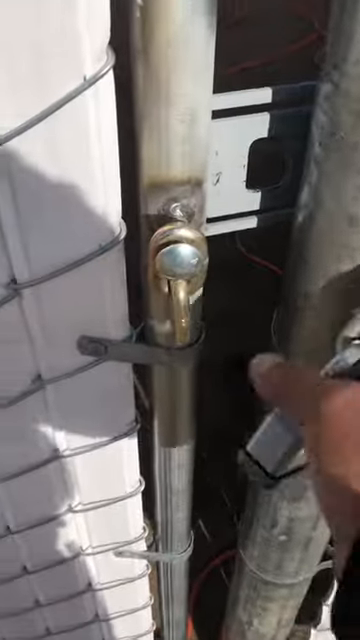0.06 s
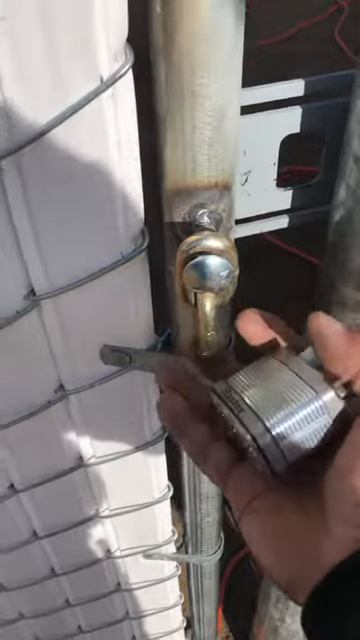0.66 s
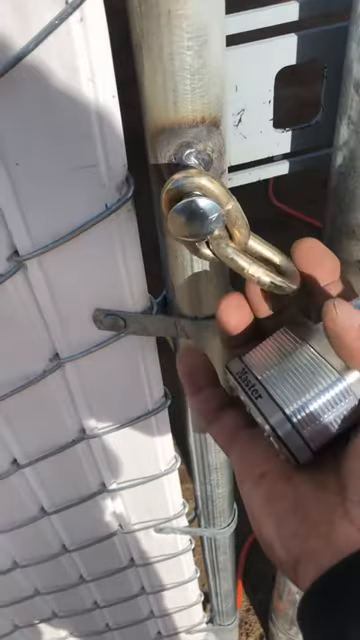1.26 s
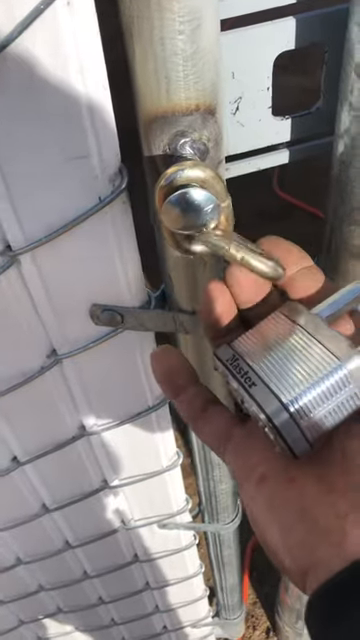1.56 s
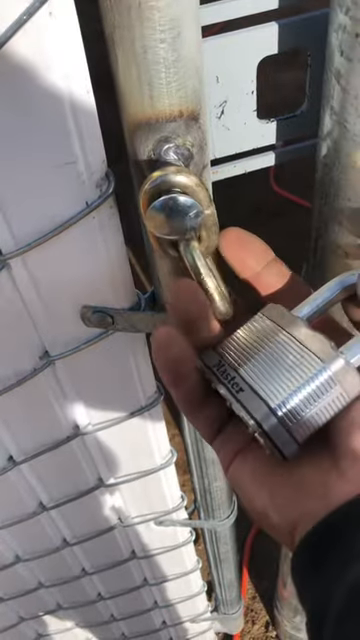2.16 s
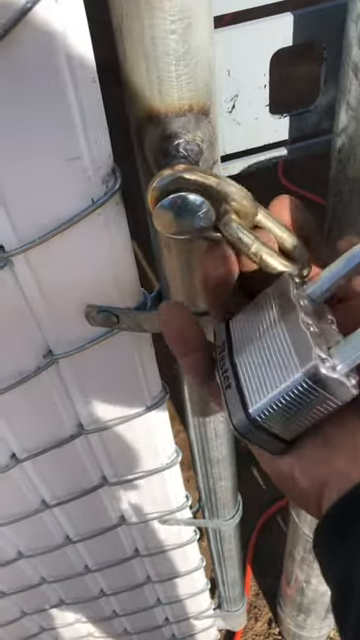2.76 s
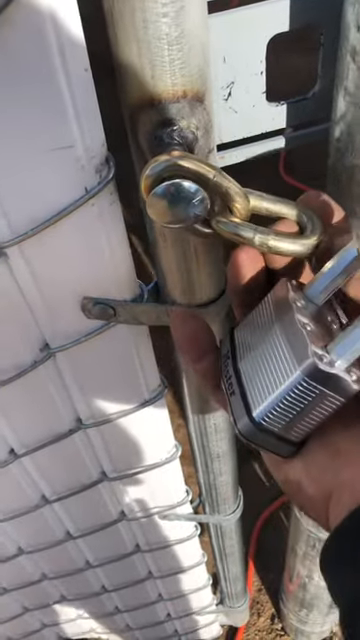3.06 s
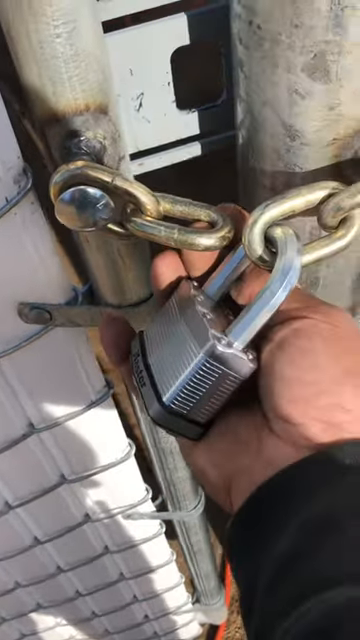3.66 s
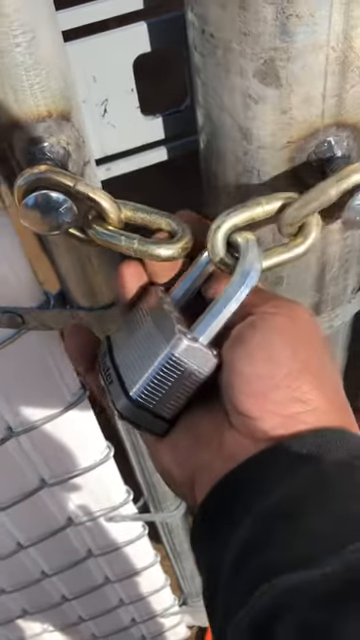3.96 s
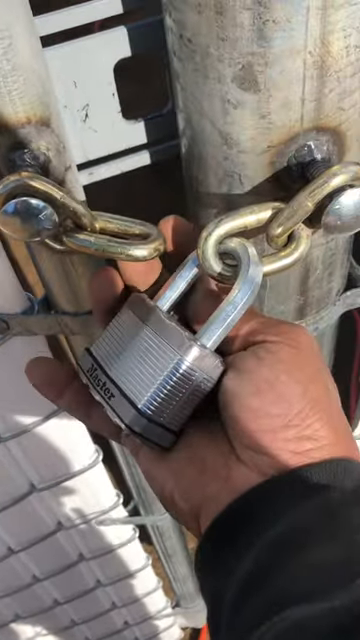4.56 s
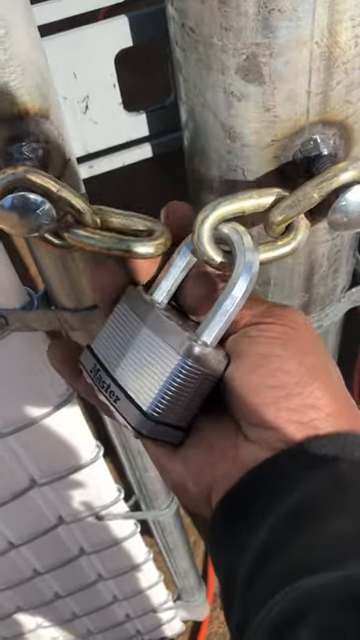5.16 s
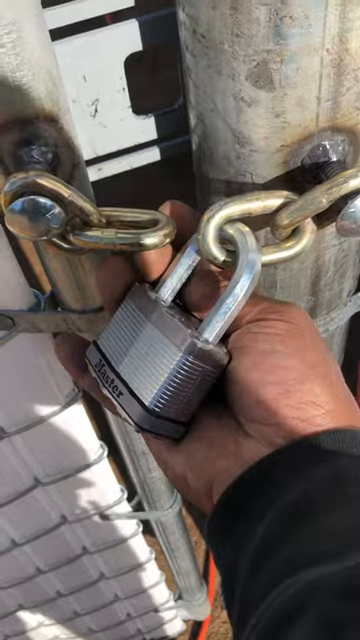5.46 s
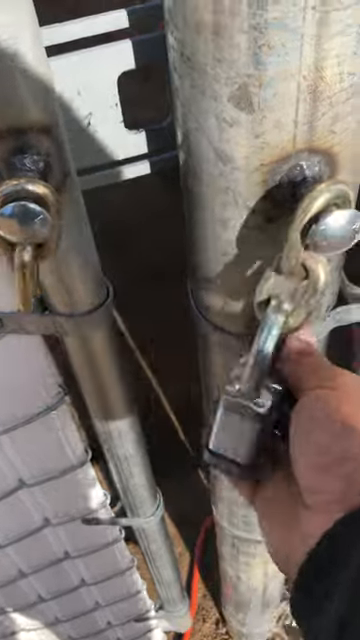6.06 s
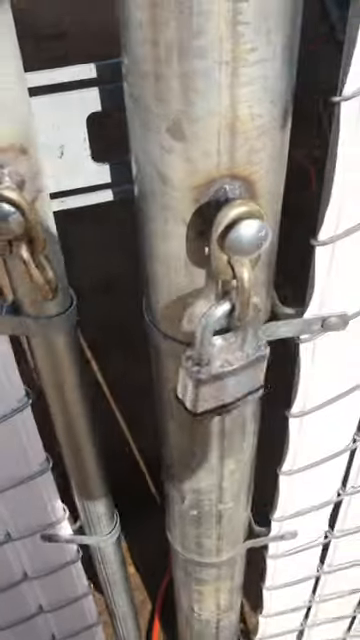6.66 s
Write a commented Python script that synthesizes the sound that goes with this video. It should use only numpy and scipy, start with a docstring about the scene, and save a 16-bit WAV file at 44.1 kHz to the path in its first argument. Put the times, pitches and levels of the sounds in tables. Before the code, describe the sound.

Close to the microphone outdoors, a hand rubs over a padlock while chain links knock against a steel gate, making it clatter and giving very high pings. The lock clicks sharply, then the chain shifts with lighter taps. Near the end the knocks pick up again and the lock swings into a hollow post with a thud and ringing clanks. Distant traffic, a low motor hum and a small bird stay faint behind.

```python
"""A padlock is hooked into a chain on a steel gate, close by and outdoors.
Links knock on the gate and ping very high; the lock clicks and swings against the hollow post.
Each hard blow is a crack, the ringing of the struck steel and a clatter from the loose gate.
Hand and sleeve rub with a grainy hiss, and there are a few thin squeaks.
Far off, traffic rumbles, a motor hums, a vehicle gathers speed and a small bird chirps."""
import sys
import numpy as np
from scipy import signal
from scipy.fft import rfft, irfft, next_fast_len
from scipy.io import wavfile
from scipy.ndimage import uniform_filter1d, map_coordinates

SR = 44100
rng = np.random.default_rng(int(sys.argv[2]) if len(sys.argv) > 2 else 0)


def materialize(psi):
    """Save the field psi as 16-bit PCM at rate SR to the path in sys.argv[1].

    A 1-D psi becomes a single channel; in a 2-D psi each row is a channel.
    """
    bounded = np.clip(np.atleast_2d(psi).T, -1, 1)
    quanta = np.round(bounded * 32767).astype(np.int16)
    wavfile.write(sys.argv[1], SR, quanta)


N = 304455
TOP_HZ = 15900  # upper edge of the treble

# The tone colour of a soft, low rush. Each row: frequency in Hz, level in dB.
RUSH_COLOUR = [(200, -22.5), (300, -1), (470, -10), (950, -8), (1500, -15.5), (2600, -23), (4000, -28),
               (7000, -34), (12500, -37.5), (16000, -38)]
# The tone colour of the gate's clatter. Each row: frequency in Hz, level in dB.
GATE_COLOUR = [(150, -9), (330, -1), (560, 2), (720, 12), (860, -5.5), (1150, 0), (1450, -9.5), (1700, -4),
               (2500, -2.5), (4100, -5), (5400, -12.5), (7000, -1.5), (9000, -18), (16000, -8.5)]
# The lock's modes (the tones it rings with). Each row: pitch in Hz, level in dB, ring time in seconds.
LOCK_TONES = [(985, -2.5, 0.17), (972, 19, 0.011), (1905, -6, 0.038), (2625, -19.5, 0.12),
              (4030, -10.5, 0.031), (4700, 4.5, 0.026), (5270, -16, 0.17), (6120, 3, 0.015),
              (6820, -1.5, 0.048), (8260, -3, .03), (9010, -10.5, 0.12), (9100, -14.5, 0.014),
              (10500, -17, 0.026), (15200, -21, .03)]
# The three high tones of a link in Hz, lowest first.
LINK_TONES_HZ = [13390, 13915, 14816]
# Spells when links slide on each other. Each row: start in seconds, length in seconds, strength in dB.
LINK_SLIDES = [(0.85, 0.28, -67.5), (1.4, 0.18, -68.5), (1.92, .25, -70.5), (2.3, .3, -62),
               (2.66, .26, -69.5), (3.86, 0.27, -69.5), (4.5, 0.76, -73.5), (5.75, 0.57, -64)]


def amp(db):
    """Turn decibels into a gain."""
    return 10 ** (np.asarray(db) / 20)


def unit(x):
    """Scale a sound to an average (rms) level of 1."""
    return x / np.sqrt(np.mean(x ** 2) + 1e-20)


def seconds(length):
    """The time of each sample, in seconds."""
    return np.arange(int(length * SR)) / SR


def wobble(rate, size=N):
    """A smooth curve through `rate` random points a second."""
    points = rng.standard_normal(int(size * rate / SR) + 4)
    return map_coordinates(points, [np.arange(size) * rate / SR])


def noise(colour, size=N):
    """Noise shaped by rows of frequency in Hz and level in dB."""
    hz, db = np.transpose(colour)
    padded = next_fast_len(size)
    gain = amp(np.interp(np.log(np.fft.rfftfreq(padded, 1 / SR) + 1), np.log(hz), db))
    return unit(irfft(rfft(rng.standard_normal(padded)) * gain, padded)[:size])


def fade(t, t60):
    """Die away by 60 dB in t60 seconds, the ring time."""
    return np.exp(-np.log(1000) * t / t60)


def add(track, start, sound):
    """Mix a sound into the track at `start` seconds."""
    part = track[max(round(start * SR), 0):][:len(sound)]
    part += sound[:len(part)]


def ring(modes, t, scatter_db=3.0, shift=0):
    """Fading tones, a little different at every blow; `shift` lets the grip nudge their pitch."""
    draws = rng.standard_normal((len(modes), 3))
    out = np.zeros(len(t))
    for (hz, db, t60), (size, grip, phase) in zip(modes, draws):
        tone = np.sin(2 * np.pi * (hz * (1 + shift * grip) * t + phase))
        out += amp(db + scatter_db * size) * fade(t, t60) * tone
    return out


def grit(rate, spread_db):
    """Tiny random slips, about `rate` a second, some larger than the rest."""
    slips = rng.random(N) < rate / SR
    sizes = amp(spread_db * np.minimum(rng.exponential(size=N), 3))
    return slips * sizes * rng.choice([-1, 1], size=N)


def movements(rows, attack_s=0.014, release_s=0.087):
    """A loudness curve in which each movement swells, holds and dies away."""
    t = np.arange(N) / SR
    return sum(amp(db) * np.clip((t - start) / attack_s, 0, 1)
               * np.clip(1 - (t - start - length) / release_s, 0, 1) for start, length, db in rows)


def whistle(hz, blur_hz):
    """A thin, raspy tone with a trembling pitch; it swells and fades."""
    pitch = hz + blur_hz * wobble(1200, size=len(hz))
    rasp = wobble(500, size=len(hz))
    return np.hanning(len(hz)) ** .5 * rasp * np.sin(2 * np.pi * np.cumsum(pitch) / SR)


def drone(hz):
    """A tone whose pitch wanders slightly."""
    return np.sin(2 * np.pi * np.cumsum(hz + 0.75 * wobble(9.8)) / SR)


def traffic():
    """A far road rumbles and rushes, slowly getting busier."""
    # The deep rumble. Each row: frequency in Hz, level in dB.
    rumble_colour = [(13, -68.5), (22, -34), (41, -8.5), (64, -3.5), (92, 1), (225, -8), (286, -18.5),
                     (328, -28), (377, -29), (450, -41.5), (580, -78), (990, -120)]
    t = np.arange(N) / SR
    rumble = amp(-52.5 + .5 * t) * noise(rumble_colour)
    rush = amp(-62.5 + 0.7066 * t + 0.3 * wobble(12)) * noise(RUSH_COLOUR)
    return rumble + rush


def motor(hum_hz=62.4):
    """A far motor hums on one low note; its level dips twice."""
    # The hum's loudness. Each row: time in seconds, level in dB.
    hum_levels = [(0.0, -51), (1.1, -64), (1.45, -49.5), (3.2, -47), (5.25, -51.5), (5.67, -64),
                  (6.2, -50.5), (6.9, -46.5)]
    level_db = np.interp(np.arange(N) / SR, *np.transpose(hum_levels))
    return amp(level_db + 1.2 * wobble(4)) * drone(hum_hz)


def vehicle(idle_hz=72.3, climb_hz_per_s=11.5, pull_away_s=2.1, rev_up_s=1.7, nearest_s=4.5, pass_s=1.1):
    """An engine idles, then fires faster and harder; it is loudest as it passes nearest."""
    t = np.arange(N) / SR
    driving_s = np.maximum(t - pull_away_s, 0)
    effort_db = -19.5 * (1 - np.minimum(driving_s / rev_up_s, 1))
    distance_db = -10 * np.log10(1 + ((t - nearest_s) / pass_s) ** 2)
    gain = amp(-50 + effort_db + distance_db + 2.9 * wobble(12))
    return gain * drone(idle_hz + climb_hz_per_s * driving_s)


def bird(gain_db=-1, rise_s=0.029, fall_s=.14, bend=0.08):
    """A far bird repeats one call: a quick rise in pitch and a longer fall."""
    # The calls. Each row: start in seconds, strength in dB.
    calls = [(1.58, -66.5), (2.73, -65.5), (3.118, -62.5), (4.472, -63.5), (6.55, -58)]
    # A call's pitch in Hz at its start, top and end.
    call_hz = (4240, 4850, 3060)
    out, length = np.zeros(N), rise_s + fall_s
    pitch = np.interp(seconds(length), [0, rise_s, length], call_hz)
    for start, db in calls:
        bent = pitch * (1 + bend * wobble(25.6, size=len(pitch)))
        add(out, start, amp(db + gain_db) * whistle(bent, blur_hz=268))
    return out


def squeaks(gain_db=-1, pitch_hz=8530):
    """Thin, high squeaks, all on one pitch."""
    # The squeaks. Each row: start in seconds, length in seconds, strength in dB.
    events = [(0.21, 0.023, -39.5), (2.713, 0.093, -64), (3.06, 0.25, -72)]
    out = np.zeros(N)
    for start, length, db in events:
        pitch = np.full(len(seconds(length)), pitch_hz)
        add(out, start, amp(db + gain_db) * whistle(pitch, blur_hz=250))
    return out


def rubbing(grain_db=1.5, patchy_db=5.0, ticks_db=-11, murmur_db=-3, firm_db=-62, brightening=0.69):
    """Skin and cloth slide with a grainy hiss, small slips tick in the lock, and the gate murmurs."""
    # The hiss of cloth. Each row: frequency in Hz, level in dB.
    cloth_colour = [(1200, -2), (2000, -8.5), (3000, 0.5), (4100, -9), (5200, -2), (7000, -13), (8800, -13),
                    (11500, -15.5), (13800, -14), (16000, -16.5)]
    # Strokes over the lock. Each row: start in seconds, length in seconds, strength in dB.
    strokes = [(0.02, 0.096, -55), (0.16, 0.16, -57), (0.39, 0.17, -59.5), (4.67, 0.25, -69),
               (5.38, 0.16, -66.5), (5.69, 0.066, -61.5), (5.79, 0.13, -56.5), (5.98, 0.25, -61.5),
               (6.58, 0.11, -59), (6.72, .18, -62)]
    # Make the hiss patchy in both pitch and time.
    spectrum = signal.stft(noise(cloth_colour), nperseg=512)[2]
    patches = uniform_filter1d(rng.standard_normal(spectrum.shape), size=9, axis=0)
    patches = uniform_filter1d(patches, size=9, axis=1)
    hiss = signal.istft(spectrum * amp(patchy_db * unit(patches)), nperseg=512)[1][:N]
    # The palm damps the lock, so only its high tones answer, briefly.
    held = [(hz, db, t60 / 2) for hz, db, t60 in LOCK_TONES if hz > 2500]
    ticks = sum(signal.oaconvolve(grit(rate=45, spread_db=8.0),
                                  ring(held, seconds(.05), scatter_db=4.5))[:N] for _ in range(4))
    slide = unit(hiss * amp(grain_db * wobble(400))) + amp(ticks_db) * unit(ticks)
    murmur = unit(noise(RUSH_COLOUR) * amp(1.3 * wobble(21)))
    # Firmer rubbing is brighter as well as louder.
    effort = movements(strokes) * amp(1.1 * wobble(14))
    treble = signal.sosfiltfilt(signal.butter(2, 7000, "high", fs=SR, output="sos"), slide)
    slide = slide - treble + treble * (effort / amp(firm_db)) ** brightening
    return effort * (slide + amp(murmur_db) * murmur)


def gate_nudges(gain_db=3):
    """While the chain shifts, its links keep nudging the gate."""
    t = seconds(0.1)
    nudges = sum(signal.oaconvolve(grit(rate=25, spread_db=2),
                                   noise(GATE_COLOUR, size=len(t)) * fade(t, 0.02))[:N] for _ in range(4))
    dull = signal.sosfilt(signal.butter(2, 2800, fs=SR, output="sos"), nudges)
    return amp(gain_db) * movements(LINK_SLIDES) * unit(dull)


def link_shimmer(gain_db=-5):
    """Sliding links catch and slip in short spells, which keeps their high tones softly ringing."""
    slips = lambda hz: signal.oaconvolve(grit(rate=400, spread_db=2), ring([(hz, 0, .035)], seconds(.1)))
    spells = lambda: amp(6 * np.tanh(1.5 * wobble(9)))
    shimmer = spells() * sum(unit(slips(hz)[:N]) * spells() for hz in LINK_TONES_HZ)
    return amp(gain_db) * movements(LINK_SLIDES) * unit(shimmer)


def fence_buzz(blows, gain_db=-31.5, t60=0.36):
    """After every blow the gate and its wire mesh go on buzzing softly."""
    t = seconds(.5)
    tail = noise(GATE_COLOUR, size=len(t)) * fade(t, t60)
    return amp(gain_db) * signal.fftconvolve(blows, tail / np.linalg.norm(tail))[:N]


def soft_blows(rows, modes, attack_s=.001):
    """Soft blows ring a few tones with no crack."""
    out, t = np.zeros(N), seconds(.4)
    for start, db in rows:
        add(out, start, amp(db) * ring(modes, t) * (1 - np.exp(-t / attack_s)))
    return out


def post_thuds():
    """Weight thrown against the post makes a low thud."""
    # The bumps. Each row: start in seconds, strength in dB.
    bumps = [(0.086, -50.5), (6.289, -37)]
    # The thud's tones. Each row: pitch in Hz, level in dB, ring time in seconds.
    tones = [(103, -1.5, 0.39), (178, 4.5, 0.12), (286, 10, 0.082), (315, -0.5, 0.28), (606, -5, 0.42)]
    return soft_blows(bumps, tones)


def anchor_bolt():
    """The chain jerks its anchor bolt, which rings."""
    # The jerks. Each row: start in seconds, strength in dB.
    jerks = [(0.757, -31), (0.843, -40)]
    # The bolt's tones. Each row: pitch in Hz, level in dB, ring time in seconds.
    tones = [(1657, 0, .17), (1705, -2, .07), (1751, -1, .17)]
    return soft_blows(jerks, tones)


def shackle():
    """The lock's open steel loop rings with two close tones."""
    # Taps on the loop. Each row: start in seconds, strength in dB.
    taps = [(2.067, -57), (2.389, -39), (5.105, -49.5)]
    # Its tones. Each row: pitch in Hz, level in dB, ring time in seconds.
    tones = [(2195, -6, .13), (2242, 0, .22)]
    return soft_blows(taps, tones)


def hard_blows(rows, modes, crack_t60, ring_db, clatter_db, knock_db, clank_db, tick_db, bright_hz):
    """Steel hits steel: a crack, the struck part's ringing and the clatter of the loose gate."""
    # Low knock, middle clank and high tick; the heavy parts answer later.
    # Each row: bottom and top in Hz, clatter ring time in seconds, rise time in seconds.
    bands = [(319, 1370, 0.14, 0.0013), (1210, 4600, 0.086, 0.00075), (5040, 20000, 0.055, 0.00037)]
    # How many dB knock, clank and tick gain for each dB of hardness.
    slopes = (0, 0.89, 2.83)
    out, t = np.zeros(N), seconds(.4)
    onset = t < .012  # each band's level is set over this first moment
    for start, strength_db, hardness_db in rows:
        # A hard blow is over sooner and shakes the gate less.
        shortening = min(amp(-0.45 * hardness_db), 1)
        crack = rng.standard_normal(len(t)) * fade(t, crack_t60 * shortening)
        ringing = amp(ring_db) * ring(modes, t, scatter_db=2.5, shift=0.0044)
        clatter = amp(clatter_db - 0.083 * hardness_db) * noise(GATE_COLOUR, size=len(t))
        # A gentle touch lasts longer, so its treble ends lower.
        top_hz = np.clip(bright_hz * amp(hardness_db * 0.8), 6500, TOP_HZ)
        for (low, high, t60, rise), db, slope in zip(bands, (knock_db, clank_db, tick_db), slopes):
            band = signal.butter(4, [low, min(high, top_hz)], "band", fs=SR, output="sos")
            swell = 1 - np.exp(-(t / rise) ** 2)
            part = signal.sosfilt(band, (crack + ringing + clatter * fade(t, t60)) * swell)
            part /= np.sqrt(np.mean(part[onset] ** 2))
            add(out, start, amp(strength_db + db + slope * hardness_db) * part)
    return out


def post_clanks():
    """The lock, and once a link, swing against the hollow post, which clanks."""
    # The blows. Each row: start in seconds, strength in dB, hardness in dB.
    blows = [(1.747, -43.5, 0.5), (6.317, -36.5, 2), (6.358, -41.5, -7.5), (6.89, -41.5, -2.5)]
    # The post's tones. Each row: pitch in Hz, level in dB, ring time in seconds.
    tones = [(610, 11.5, .25), (965, 11, 0.16), (1305, 3, 0.16), (1630, 1, 0.18), (2190, -3, .15),
             (2340, -19, 0.096), (2900, 7.5, 0.18), (2855, -2.5, 0.2), (3310, 4, 0.082), (3440, -3, 0.099),
             (4060, -4.5, 0.11), (4500, 0, .07)]
    return hard_blows(blows, tones, crack_t60=0.013, ring_db=-16, clatter_db=1.5,
                      knock_db=-8, clank_db=5.5, tick_db=-12, bright_hz=13500)


def link_pings(beat_hz=38, damped_t60=0.09, upper_life=0.47, pair_db=-2, tick_db=-2, tick_t60=0.022):
    """A loose link ticks and rings until it is touched; its upper tones die sooner."""
    # The pings. Each row: start in seconds, strength in dB, middle tone in dB against the low one,
    # seconds until touched, the low tone's free ring time in seconds.
    pings = [(0.69, -51, -1, 0.071, 0.25), (0.753, -42.5, -2, 0.14, 2.3), (0.8414, -10, -7, 0.058, 1.8),
             (1.727, -48.5, -7, .02, .15), (2.033, -21.5, -15, 0.14, 0.26), (2.514, -50, 0, 0.057, 0.22),
             (4.108, -51, 9, 0.023, 0.074)]
    out, t = np.zeros(N), seconds(.5)
    low_hz, middle_hz, high_hz = LINK_TONES_HZ
    tone = lambda hz: np.sin(2 * np.pi * hz * t)
    pair = tone(high_hz - beat_hz / 2) + tone(high_hz + beat_hz / 2)  # two close tones flutter
    treble = signal.butter(4, [6500, TOP_HZ], "band", fs=SR, output="sos")
    for start, db, middle_db, free_s, t60 in pings:
        upper = amp(middle_db) * tone(middle_hz) + amp(pair_db) * pair
        ringing = tone(low_hz) * fade(t, t60) + upper * fade(t, upper_life * t60)
        tick = amp(tick_db) * signal.sosfilt(treble, rng.standard_normal(len(t))) * fade(t, tick_t60)
        damping = fade(np.maximum(t - free_s, 0), damped_t60)
        add(out, start, amp(db) * (tick + ringing) * damping)
    return out


def chain_knocks():
    """Links knock on the gate and make it clatter."""
    # The knocks. Each row: start in seconds, strength in dB, hardness in dB.
    knocks = [(0.69, -36.5, -4.5), (0.731, -35, -6.5), (0.754, -27, 3.5), (0.763, -34, -8),
              (0.835, -33.5, 6.5), (0.842, -34, 4), (0.889, -35.5, 0), (0.972, -40, -5.5),
              (1.033, -46.5, -23.5), (1.417, -35.5, -21), (1.443, -37, -7.5), (1.726, -37.5, -0.5),
              (1.75, -36, -0.5), (1.967, -35.5, -8), (1.998, -36, -3), (2.031, -26.5, 0),
              (2.048, -34.5, -2.5), (2.066, -25.5, -2.5), (2.142, -39, -21), (2.361, -37, -13.5),
              (2.387, -26, -4), (2.433, -39, -15), (2.472, -34.5, -11), (2.566, -30.5, -10.5),
              (2.691, -35.5, -24), (2.872, -42.5, -33), (3.109, -44.5, -21), (3.331, -43, -9),
              (3.643, -44, -9), (5.033, -44.5, -5.5), (5.105, -36.5, -2), (5.267, -45, -7.5),
              (5.709, -38, -39), (5.792, -32.5, -17), (5.818, -31.5, -13), (5.871, -37.5, -31),
              (5.957, -39, -13), (6.074, -39, -20.5), (6.13, -43, -14), (6.289, -28, -11)]
    # The tones they ring. Each row: pitch in Hz, level in dB, ring time in seconds.
    tones = [(687, -1.5, 0.12), (744.6, 0, 0.149), (977.6, -6, .16), (1216, -13.5, 0.04), (1647, -12, 0.17),
             (1864, -21.5, 0.087), (2237, -0.5, 0.2), (2810, -6.5, 0.16), (3160, -7.5, 0.14),
             (3680, -9.5, .08), (4310, -9, 0.027), (4470, -12.5, .09), (6970, -6, .09), (7040, -10, .16)]
    return hard_blows(knocks, tones, crack_t60=0.014, ring_db=-12.5, clatter_db=-1.5,
                      knock_db=-8, clank_db=-8, tick_db=-13.5, bright_hz=12700)


def padlock_clicks():
    """The padlock clicks sharply and barely shakes the gate."""
    # The clicks. Each row: start in seconds, strength in dB, hardness in dB.
    clicks = [(0.052, -42.5, -7.5), (0.085, -46, -5.5), (1.092, -56, -1.5), (2.515, -29.5, 3.5),
              (2.597, -46.5, 5.5), (4.107, -59.5, -2), (6.216, -51, -1), (6.288, -28.5, 8),
              (6.443, -52, -12), (6.622, -50, 0), (6.667, -45.5, -2)]
    return hard_blows(clicks, LOCK_TONES, crack_t60=0.016, ring_db=-19.5, clatter_db=-17.5,
                      knock_db=-8, clank_db=-4.5, tick_db=-11.5, bright_hz=15000)


def scene():
    """Mix the steel, the hand and the far sounds into one channel."""
    steel = chain_knocks() + padlock_clicks() + post_clanks() + anchor_bolt() + shackle() + post_thuds()
    near = steel + fence_buzz(steel) + link_pings() + link_shimmer() + gate_nudges() + rubbing()
    return (near + bird() + squeaks() + motor() + vehicle() + traffic())[None]


def record(dry):
    """A phone cuts off the treble steeply above TOP_HZ."""
    padded = next_fast_len(N + SR // 2)
    hz = np.fft.rfftfreq(padded, 1 / SR)
    return irfft(rfft(dry, padded) / np.sqrt(1 + (hz / TOP_HZ) ** 160), padded)[:, :N]


dry = scene()
out = record(dry)
materialize(out)
```